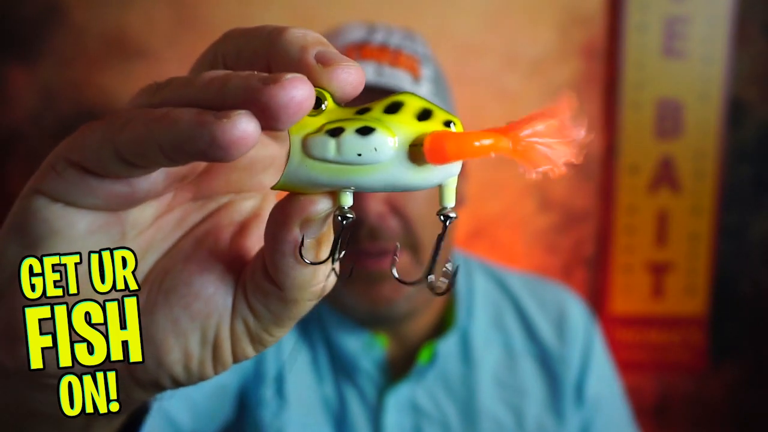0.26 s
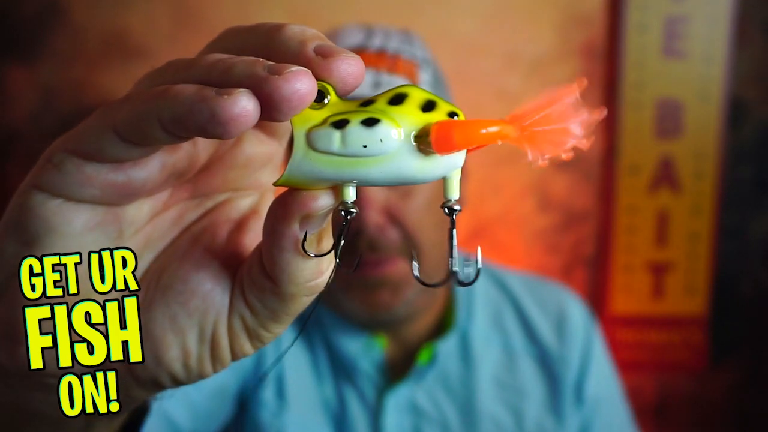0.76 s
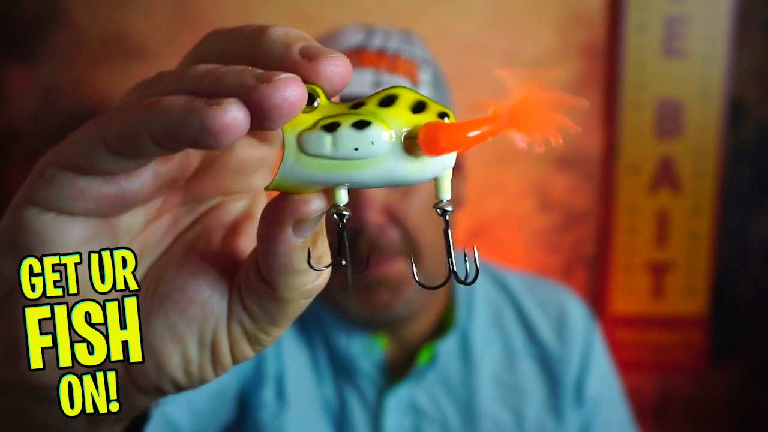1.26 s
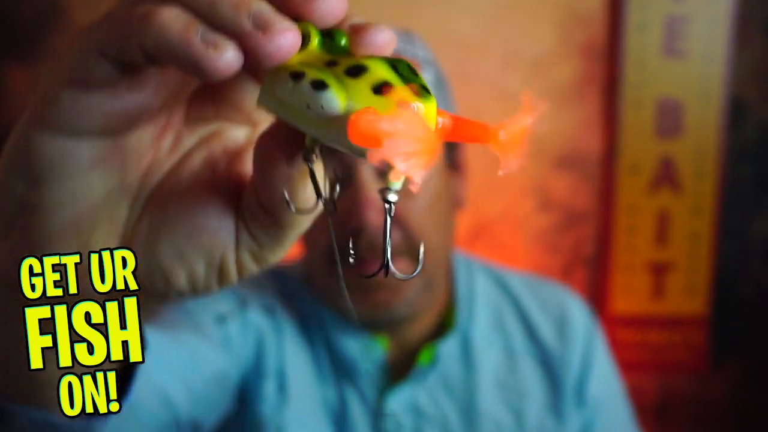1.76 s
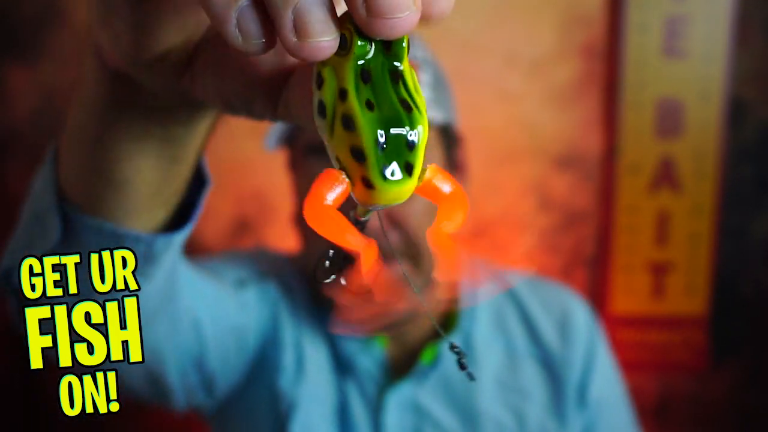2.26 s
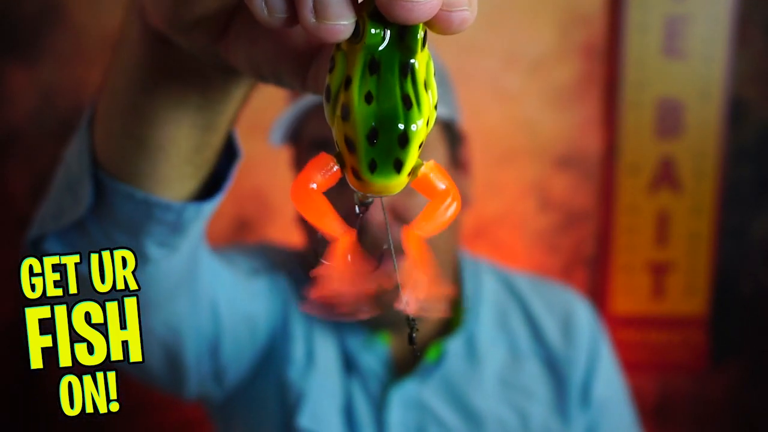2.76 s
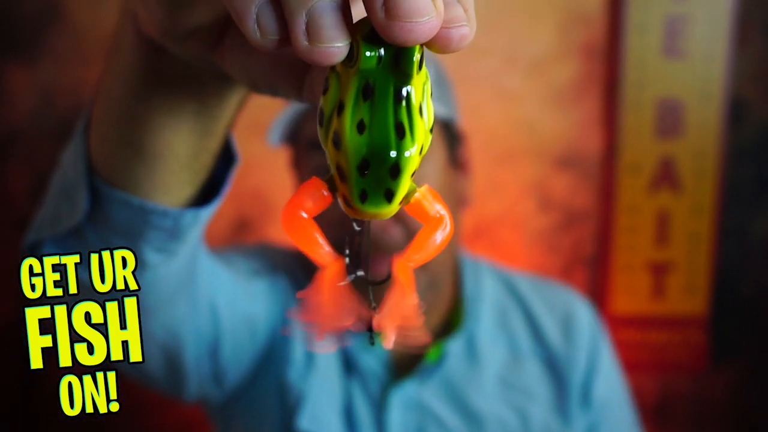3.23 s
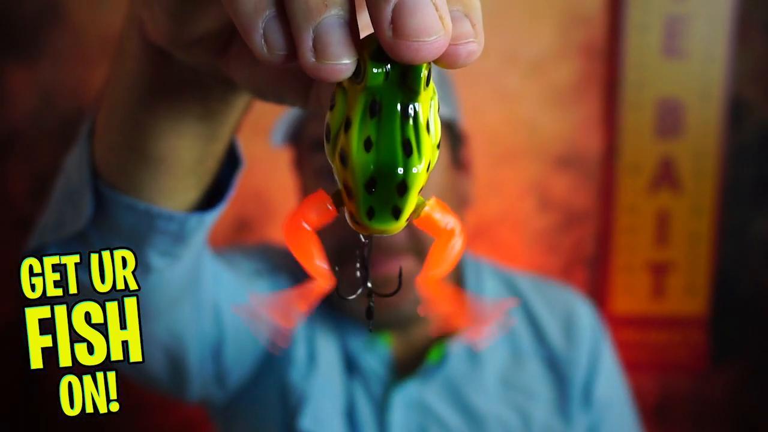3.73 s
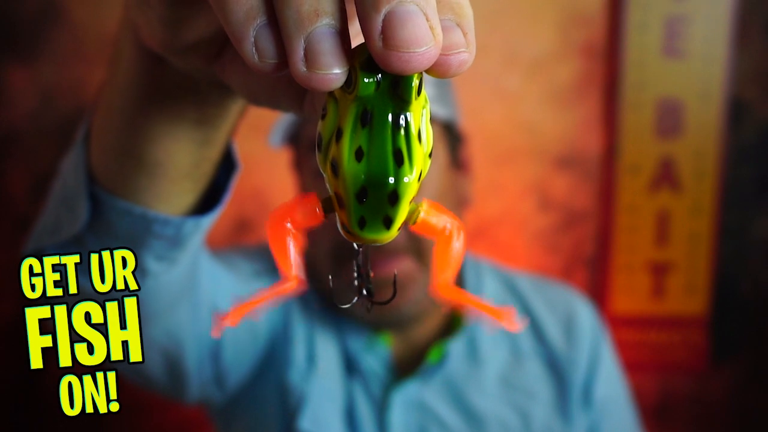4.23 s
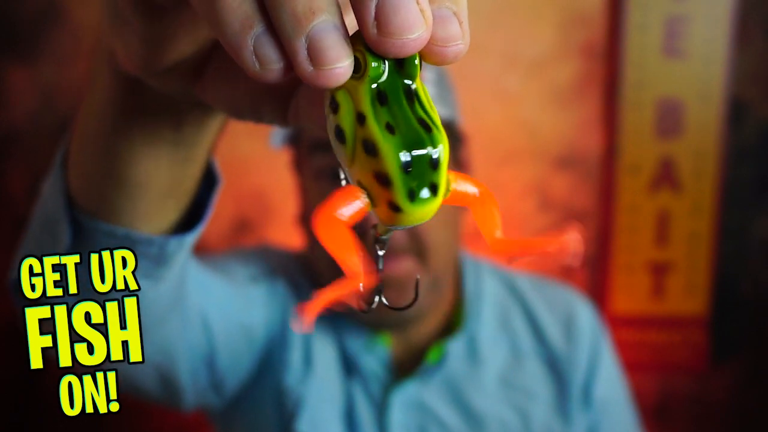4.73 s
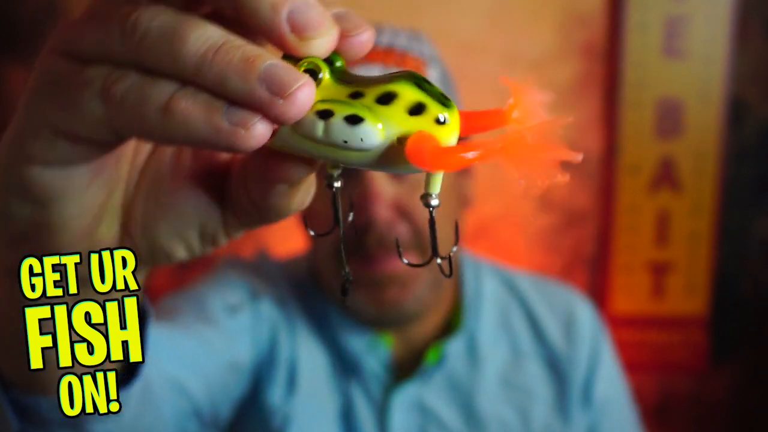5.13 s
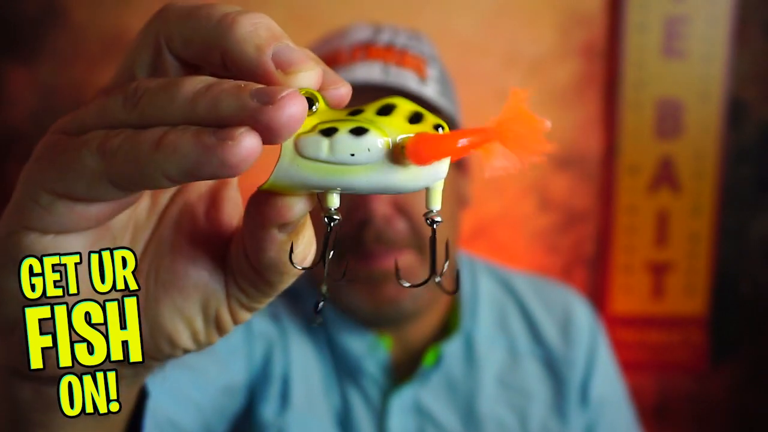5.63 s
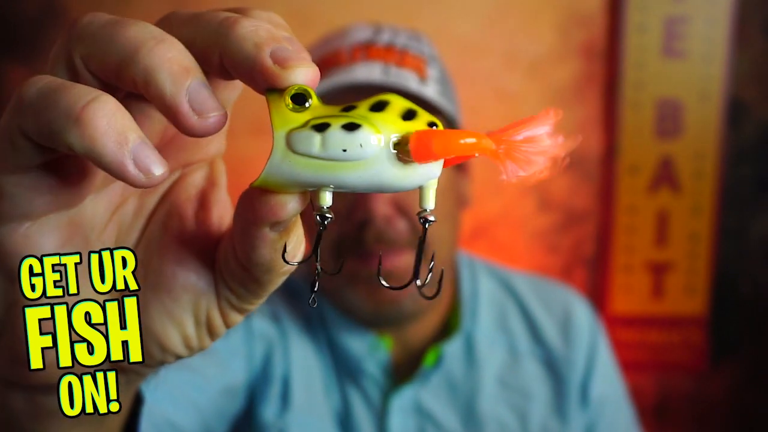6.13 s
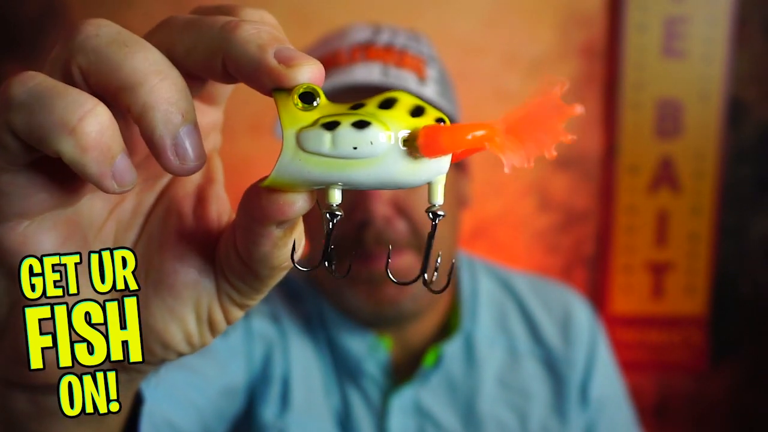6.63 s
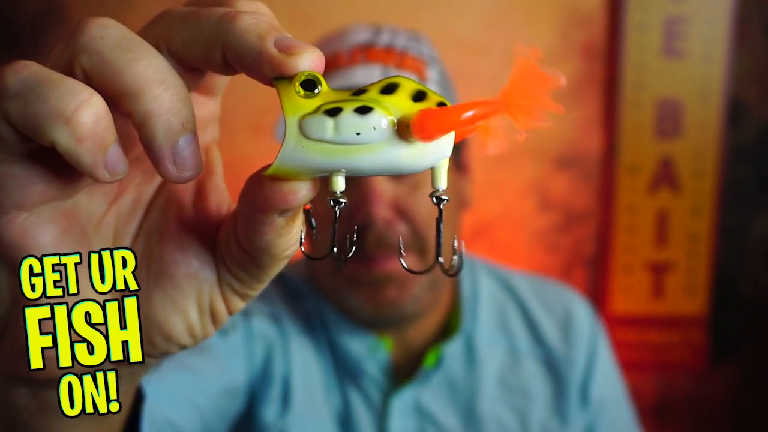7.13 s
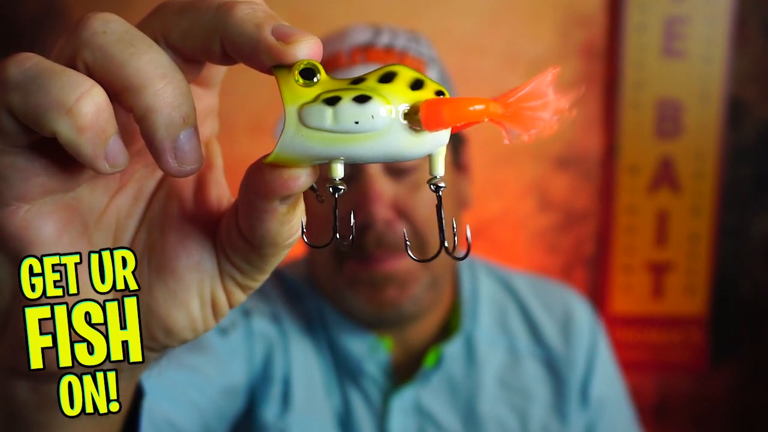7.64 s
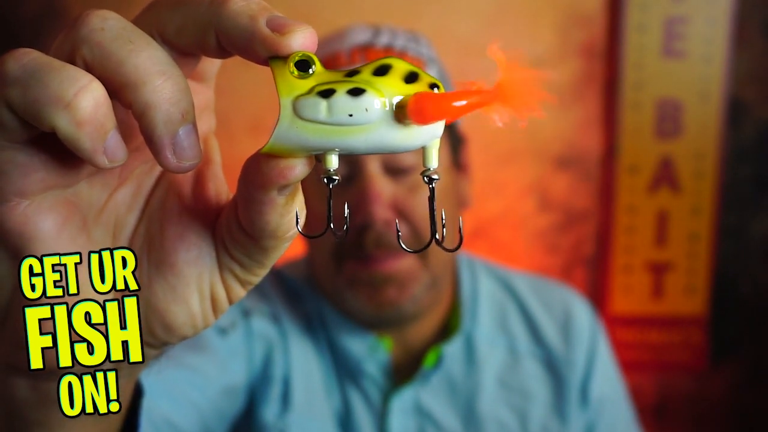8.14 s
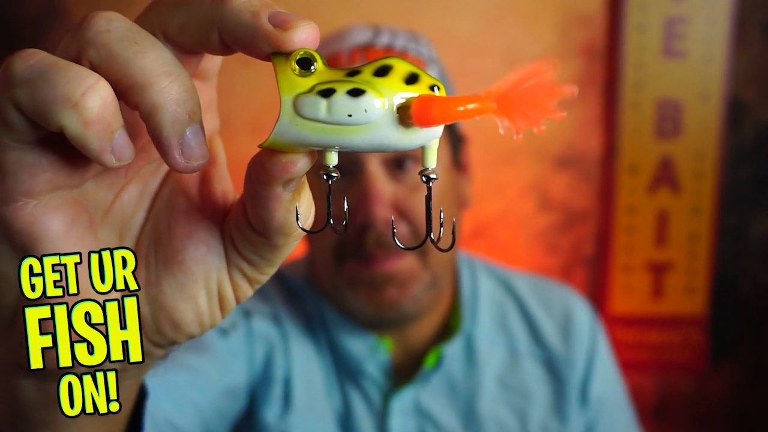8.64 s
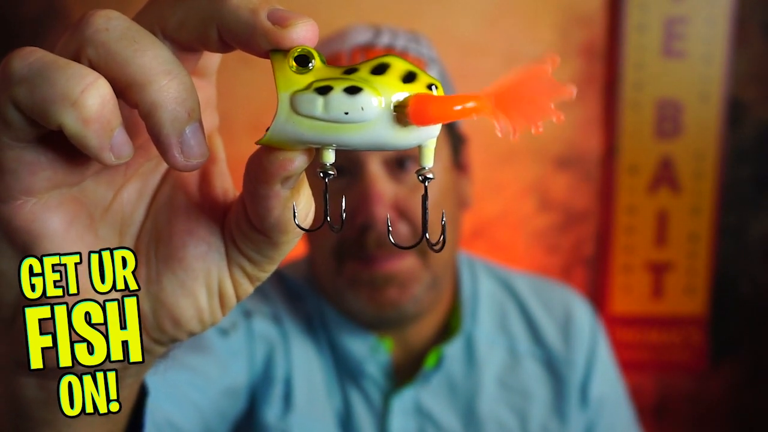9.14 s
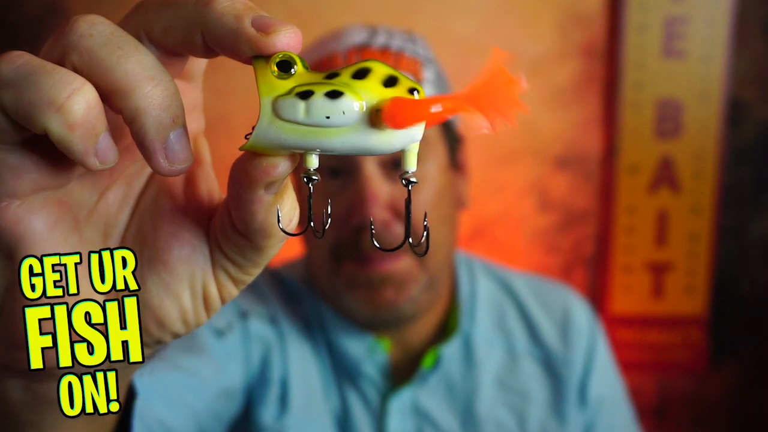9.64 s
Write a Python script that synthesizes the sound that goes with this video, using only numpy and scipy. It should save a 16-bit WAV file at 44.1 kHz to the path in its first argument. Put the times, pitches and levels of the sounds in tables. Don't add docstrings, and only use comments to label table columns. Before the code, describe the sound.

A small wind-up plastic toy clatters rapidly close up, hard dry double clicks with gear whirr, over a faint steady low hum and hiss.

```python
import sys
import numpy as np
from scipy import signal
from scipy.fft import rfft, irfft, next_fast_len
from scipy.io import wavfile

SR = 44100
rng = np.random.default_rng(int(sys.argv[2]) if len(sys.argv) > 2 else 0)


def amplitude_ratio(level_db):
    exponent = np.asarray(level_db, float) / 20
    return 10 ** exponent


def store_wav(level_fs):
    pcm = np.round(np.clip(np.atleast_2d(level_fs), -1, 1) * 32767)
    wavfile.write(sys.argv[1], SR, pcm.T.astype(np.int16))


N = 436149
RING = 1024
FRAME_HZ = 59.94
KICKS = 77

# f/Hz, level/dB per Hz
AIR_COLOUR = [(20, -0.5), (100, -8), (300, -8), (470, -12), (600, -6), (680, -7), (850, -17), (3000, -39),
              (15000, -43)]
# f/Hz, level/dB per Hz
HISS_COLOUR = [(20, 7), (300, 0.5), (1000, -1.5), (3000, -9.5), (8000, -11.5), (15700, -5), (16100, -40)]
# multiple of the frame rate, level/dB rms
HUM_LINES = [(1, -41), (2, -60), (3, -59), (4, -61), (5, -75), (6, -75), (215, -75), (216, -74)]
# multiple of a quarter frame rate, level/dB rms
PATTERN_LINES = [(2, -71), (3, -74), (5, -75), (9, -76), (13, -75), (17, -71), (19, -72), (21, -72),
                 (23, -74), (25, -75)]

# t/s, level/dB
WHIRR_LEVEL = [(0.0, -47.5), (1.7, -48.5), (2.3, -47.5), (4.9, -48), (5.2, -49.5), (9.59, -51),
               (9.89, -56.5)]
# f/Hz, level/dB
GEAR_COLOUR = [(600, -39.5), (1100, -5), (2200, -4), (4300, 1.5), (6500, 4.5), (8500, -3), (11500, -7.5),
               (16000, -30)]
WHIRR_SAG_DB_S = 40.0

# t/s, peak level/dB
GRIP_BUMPS = [
    (0.171, -42),
    (1.874, -42),
    (2.073, -36.5),
    (2.187, -38),
    (2.24, -45),
    (5.157, -45),
    (5.609, -47),
    (7.326, -42),
]

# f/Hz, t60/s, level/dB
BELLY_MODES = [(3283, 0.0045, -5), (3890, 0.006, -5), (4466, 0.0049, -1.5), (5038, 0.0069, -0.5)]
BACK_MODES = [(6580, 0.0054, -3), (6195, 0.0072, -7), (7070, 0.0052, -7.5)]
HOLLOW_MODES = [(1413, 0.007, 4), (1790, 0.0094, 2.9), (2217, 0.006, 0.5)]
EDGE_MODES = [(7950, 0.0044, 2), (8850, 0.0042, 1.5), (9730, 0.0042, 2.5), (11000, .004, -18),
              (11820, .004, -8), (13300, 0.003, -6.5), (14800, 0.0048, -17)]
# f/Hz, t60/s, level/dB
CAVITY_MODES = [(1084, 0.014, 0)]
# t/s, level/dB
CAVITY_LEVEL = [(1.7, -3), (2.3, -1), (4.9, -0.5), (5.2, -4)]
BELLY_TOP = [-2, 5.0]
RIM_HANGING_DB = 8

# delay t/s, spread t/s, level/dB
STRIKE_CLUSTER = [(-.0012, 0.0002, -9.5), (0, .0001, 8), (.0006, 0.000098, -1.5), (.0013, 0.00026, -7)]
FIRST_STRIKE = [6.5, -8.0]
# delay t/s, level/dB
CHATTER = [(.004, -20), (.0062, -23), (.0085, -19.5), (.011, -24.5), (.015, -34)]

# t/s, level/dB, brightness/dB
SPRING_KNOCKS = [(0.0225, -19, -3), (0.055, -29.5, -2), (0.1748, -21, -6), (0.27, -16, -2),
                 (0.3053, -23, -5), (0.4267, -22, -3), (0.5555, -26, -9)]
# stroke (0 outward, 1 return), t/ms after that snap, chance 0-1,
# level/dB against it, brightness/dB
SIDE_SLACK = [(1, -3, .5, -19.5, -3), (0, 7.5, .6, -22, 7), (1, -19.5, .35, -24, 6), (1, 7.6, .35, -20, 6)]
HANGING_SLACK = [(1, -6.0, .9, -14.5, -5), (1, 24.0, .75, -17, -9), (0, -15.5, .55, -21, -7),
                 (1, 11, .3, -18, 3), (1, 45.0, .3, -25, -10)]
SLACK_JITTER_S, SLACK_SCATTER_DB = 0.0008, 2.0
SLACKENS_S = 5.0

# return snap t/s, kicks done, outward snap earlier by t/ms,
# return level/dB, outward level/dB
CRANK_PROGRESS = [(0.0686, 0, 56, -11, -16.5), (0.1889, 1, 56.6, -13, -17), (1.0875, 8, 63.4, -13.5, -14),
                  (1.7449, 13, 59.9, -15, -16), (2.095, 16, 39.8, -16.5, -18),
                  (3.2689, 26, 38.6, -18.5, -20.5), (3.7478, 30, 36.6, -18, -20),
                  (4.2198, 34, 35.7, -18.5, -21.5), (5.0824, 41, 41.3, -16.5, -17),
                  (5.2192, 42, 60.2, -14.5, -16.9), (6.0386, 48, 64, -14.5, -17),
                  (6.5713, 52, 63.3, -15, -18), (6.991, 55, 61.8, -16.5, -16), (7.8075, 61, 64.1, -16, -18),
                  (8.3755, 65, 63.8, -17, -18.2), (9.6344, 74, 62.2, -16, -18),
                  (9.794, 75, 77.1, -23.4, -19.5), (9.974, 76, 86, -27, -28)]
RETURN_JITTER_S, OUTWARD_JITTER_S = 0.0004, 0.0005
RETURN_SCATTER_DB, OUTWARD_SCATTER_DB, COLOUR_SCATTER_DB = 0.75, 0.46, 0.85
# t/s, extra level/dB, extra back brightness/dB
GEAR_STUMBLES = [(0.3841, 1.0, 1), (0.6404, 2, 1), (0.8983, -3.5, -1), (1.4201, -4, -1.5),
                 (1.5531, 2.5, 0.3), (1.684, -2.5, 0), (1.9354, 3.5, 0.3), (2.0546, 3, 0), (2.174, -2, 0),
                 (2.9981, 1, -0.2), (3.1136, -2.5, 0.3), (3.3482, 2, 2), (3.5921, -2.0, 0), (3.8255, 1, 0),
                 (4.425, 2.5, 1), (4.589, -2.5, 0.3), (5.766, -2.5, -1), (6.1107, 2.5, 2),
                 (6.2417, -2, -0.5), (6.5097, 2.0, 0), (7.3357, -2.5, 0.3), (7.4715, 2.5, 1),
                 (7.6102, 1.5, 0), (8.0253, -2.0, 0.3), (8.5938, 2.0, 1.3), (8.7336, 2.5, 1.5),
                 (8.8739, 2.5, 2), (9.0084, -1.0, 1.2), (9.147, 0.0, -0.5), (9.6373, -3.5, 0.3)]
# t/s, hanging head up 0-1, back turned to the camera level/dB
HELD_POSE = [
    (1.3, 0, 2.5),
    (1.75, 0, .6),
    (2.3, 0.95, -1),
    (4.9, 0.95, 0.2),
    (5.2, 0.01, 0.2),
    (6.3, 0, 0.6),
    (7.2, 0, 0),
    (9.8, 0, -2),
]
# belly, back, hollow, edge level/dB
SIDE_ON_PARTS = [(-2, -7, -17, -10.5), (-5.5, -3.5, -19.5, -7)]
# belly, back, hollow, edge level/dB
HANGING_PARTS = [(-2, -6.5, -15, -10), (-5.5, -4, -16.5, -5)]


def unit(x):
    return x / np.sqrt(np.mean(x ** 2))


def colour(x, points):
    hz, db = np.transpose(points)
    size = next_fast_len(len(x))
    bins = np.arange(size // 2 + 1) * SR / size + 1
    gain = amplitude_ratio(np.interp(np.log(bins), np.log(hz), db))
    return irfft(rfft(x, size) * gain, size)[:len(x)]


def follow(table, column, s):
    points = np.transpose(table)
    return np.interp(s, points[0], points[column])


def noise_bed(points, db):
    return amplitude_ratio(db) * unit(colour(rng.standard_normal(N), points))


def hum():
    turn = 2 * np.pi * FRAME_HZ * np.arange(N) / SR
    ripple = sum(amplitude_ratio(db) * np.cos(k * (turn - 0.85) + 0.5) for k, db in HUM_LINES)
    pattern = sum(amplitude_ratio(db) * np.cos(k * turn / 4 + 2 * np.pi * rng.random()) for k, db in PATTERN_LINES)
    return np.sqrt(2) * (ripple + pattern)


def room(x, t60=0.26, gap=0.00277):
    hop = 2048
    t, out = np.arange(SR // 2) / SR, np.zeros(N + SR)
    fade = np.exp(-np.log(1000) * t / t60) * (t > gap)
    window = np.sqrt(np.hanning(2 * hop))
    for start in range(-hop, N, hop):
        piece = np.pad(x[max(start, 0):start + 2 * hop], (max(-start, 0), 2 * hop))[:2 * hop] * window
        patches = amplitude_ratio(2.3 * np.repeat(rng.standard_normal(len(t) // 32 + 1), 32)[:len(t)])
        echo = signal.fftconvolve(piece, rng.standard_normal(len(t)) * patches * fade)
        out[start + hop:][:len(echo)] += echo
    wash = out[hop:hop + N] / np.sqrt(np.sum(fade ** 2))
    return colour(wash, [(1000, -0.065), (3000, -0.2), (5000, -4), (6500, 1.5), (9000, -2.0), (12000, 0.0)])


def bumps():
    t, out = np.arange(RING) / SR, np.zeros(N)
    thump = np.sin(2 * np.pi * 270 * t) * np.exp(-(t - 0.004) ** 2 / 0.0021 ** 2)
    for s, db in GRIP_BUMPS:
        out[int(s * SR):][:RING] = amplitude_ratio(db) * thump
    return out


def whirr(cam):
    chance, size, rub = rng.random(N), rng.exponential(size=N), rng.standard_normal(N)
    teeth = (chance < 900 / SR) * amplitude_ratio(3.9 * np.minimum(size, 3.4)) * np.sign(rub)
    smear = rng.standard_normal(96) * np.exp(-np.arange(96) / 25)
    grains = unit(np.convolve(teeth, smear)[:N]) + 0.57 * rub
    t = np.arange(N) / SR
    since_snap = t - cam[0][np.maximum(np.searchsorted(cam[0], t) - 1, 0)]
    db = follow(WHIRR_LEVEL, 1, t) + 0.7 - WHIRR_SAG_DB_S * since_snap
    return unit(colour(grains, GEAR_COLOUR)) * amplitude_ratio(db)


def ring(modes, delays, energy_db, first_db, top_db=0, scatter_db=2.0, detune=0.03, contact=0.000084):
    out = np.zeros((len(delays), RING))
    top_db = np.reshape(top_db, (-1, 1))
    for k, (_, _, strike_db) in enumerate(STRIKE_CLUSTER):
        t = np.maximum(np.arange(RING) / SR - delays[:, k:k + 1], 0)
        push = amplitude_ratio(first_db * (k == 0))[:, None] * (1 - np.exp(-t / contact))
        for hz, t60, db in modes:
            size, pitch, sign = rng.standard_normal((len(delays), 3)).T[:, :, None]
            wave = np.sin(2 * np.pi * hz * (1 + detune * pitch) * t) * np.exp(-np.log(1000) * t / t60)
            mode_db = db + strike_db + scatter_db * size + top_db * (hz == modes[-1][0])
            out += np.sign(sign) * amplitude_ratio(mode_db) * push * wave
    energy = np.sum(out ** 2, axis=1, keepdims=True) / (SR / 1000)
    return out * amplitude_ratio(energy_db)[:, None] / np.sqrt(energy)


def shell(s, belly_db, back_db, hollow_db, edge_db, first_db=0, top_db=0):
    delay, spread, _ = np.transpose(STRIKE_CLUSTER)
    lead = 0.003
    delays = lead + delay + spread * rng.standard_normal((len(s), len(STRIKE_CLUSTER)))
    first_db = first_db + np.zeros(len(s))
    rim_db = RIM_HANGING_DB * follow(HELD_POSE, 1, s)
    cavity_db = hollow_db + follow(CAVITY_LEVEL, 1, s)
    rows = ring(BELLY_MODES, delays, belly_db, first_db, top_db)
    rows += ring(BACK_MODES, delays, back_db, first_db, detune=0.02)
    rows += ring(HOLLOW_MODES, delays, hollow_db, first_db)
    rows += ring(EDGE_MODES, delays, edge_db, first_db, rim_db)
    rows += ring(CAVITY_MODES, delays, cavity_db, first_db, detune=0.011)
    out = np.zeros(N + 2 * RING)
    np.add.at(out, ((s - lead) * SR).astype(int)[:, None] + np.arange(RING), rows)
    return out[:N]


def slack(cam):
    s, db, hanging = cam[:3]
    stroke_now = np.arange(len(s)) % 2
    side_on = (1 - hanging) * np.clip(s / SLACKENS_S - 0.15, 0, 1)
    rows = []
    for rules, share in ((SIDE_SLACK, side_on), (HANGING_SLACK, hanging)):
        for stroke, after_ms, chance, below_db, bright_db in rules:
            luck = rng.random(len(s))
            late, size, tone = rng.standard_normal((len(s), 3)).T
            hit = (stroke_now == round(stroke)) & (luck < chance * share) & (s < N / SR - 0.05)
            when = s + after_ms / 1000 + SLACK_JITTER_S * late
            level_db = db + below_db + 10.5 + SLACK_SCATTER_DB * size
            rows.append(np.c_[when, level_db, bright_db + 4.0 * tone][hit])
    return np.vstack(rows)


def knocks(cam):
    s, db, bright = np.vstack([SPRING_KNOCKS, slack(cam)]).T
    db = db - 13.5
    tilt = bright / 2
    return shell(s, db - tilt, db + 0.5 + tilt, db - 8.5 - tilt, db - 3.5 + tilt)


def rebounds(cam):
    s, _, _, belly, back, hollow, edge = np.repeat(cam, len(CHATTER), axis=1)
    delay, db = np.tile(CHATTER, (cam.shape[1], 1)).T
    late, size, bright = rng.standard_normal((len(s), 3)).T
    db = db + 2.3 * size
    return shell(s + delay + 0.0006 * late, belly + db, back + db + 1.9 * bright,
                 hollow + db + 5.5, edge + db + 2.0 + 2.9 * bright)


def beat():
    columns = np.transpose(CRANK_PROGRESS)
    s, _, lead_ms, return_db, outward_db = (np.interp(np.arange(KICKS), columns[1], c) for c in columns)
    late, early, hard, soft = rng.standard_normal((KICKS, 4)).T
    outward_s = s - lead_ms / 1000 + OUTWARD_JITTER_S * early
    return_s = s + RETURN_JITTER_S * late
    s = np.c_[outward_s, return_s].ravel()[:-1]
    db = np.c_[outward_db + OUTWARD_SCATTER_DB * soft, return_db + RETURN_SCATTER_DB * hard].ravel()[:-1]

    at, harder_db, brighter_db = np.transpose(GEAR_STUMBLES)
    snap = np.abs(s[:, None] - at).argmin(axis=0)
    s[snap], db[snap] = at, db[snap] + harder_db

    hanging = np.clip(follow(HELD_POSE, 1, s), 0, 1)
    stroke = np.arange(len(s)) % 2
    parts = (1 - hanging) * np.array(SIDE_ON_PARTS)[stroke].T + hanging * np.array(HANGING_PARTS)[stroke].T
    facing_db = follow(HELD_POSE, 2, s)
    facing_db[snap] += brighter_db
    turn = np.outer([-0.5, 1, -1, 0], facing_db)
    scatter = COLOUR_SCATTER_DB * rng.standard_normal((len(s), 4)).T
    return np.vstack([s, db, hanging, db + parts + turn + scatter])


def snaps(cam):
    first_db, top_db = (np.resize(v, cam.shape[1]) for v in (FIRST_STRIKE, BELLY_TOP))
    return shell(cam[0], *cam[3:], first_db, top_db)


def scene():
    cam = beat()
    toy = snaps(cam) + rebounds(cam) + knocks(cam)
    toy = signal.sosfilt(signal.butter(3, 900, "high", fs=SR, output="sos"), toy)
    centre = toy + amplitude_ratio(-15.0) * room(toy) + whirr(cam) + bumps() + noise_bed(AIR_COLOUR, -57.5) + hum()
    hiss = [noise_bed(HISS_COLOUR, -60.5) for _ in range(2)]
    return centre + np.array(hiss)


def top_cut(x):
    return signal.sosfilt(signal.butter(12, 16970, fs=SR, output="sos"), x)


def record(dry):
    cut = signal.sosfilt(signal.butter(12, 16300, fs=SR, output="sos"), dry)
    return top_cut(cut)


dry = scene()
out = record(dry)
store_wav(out)
```